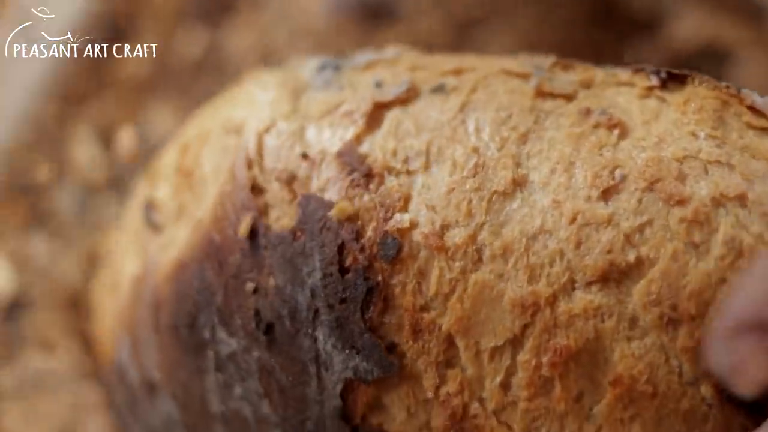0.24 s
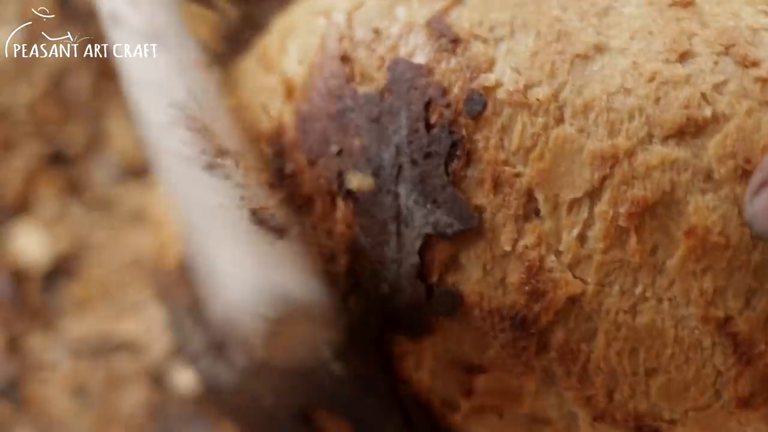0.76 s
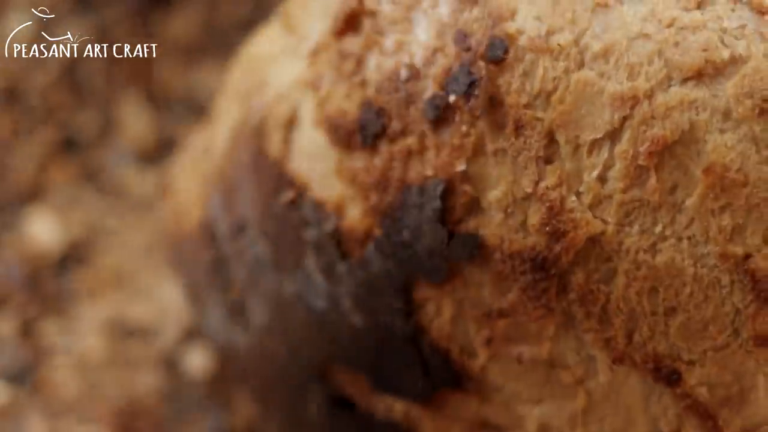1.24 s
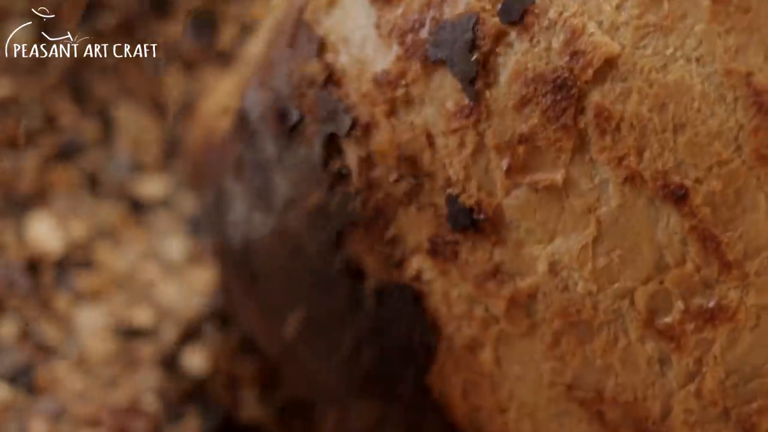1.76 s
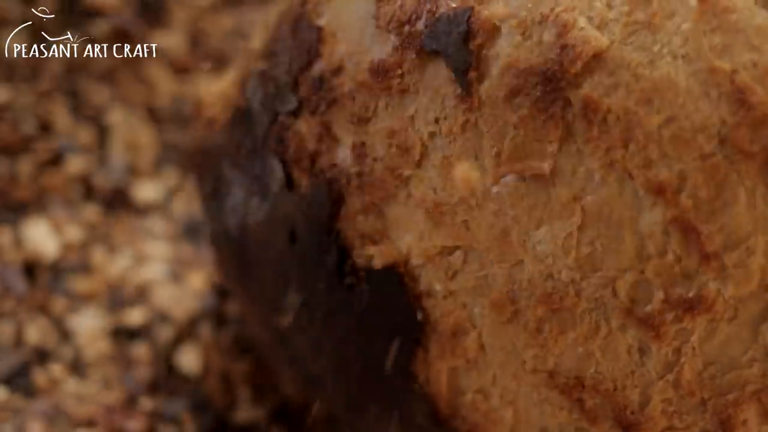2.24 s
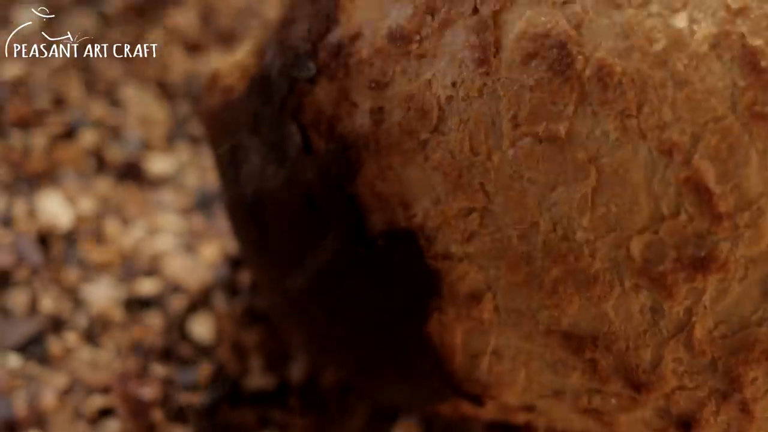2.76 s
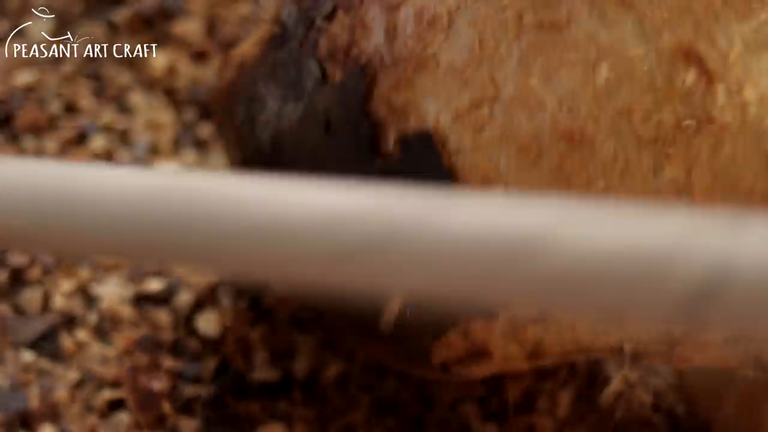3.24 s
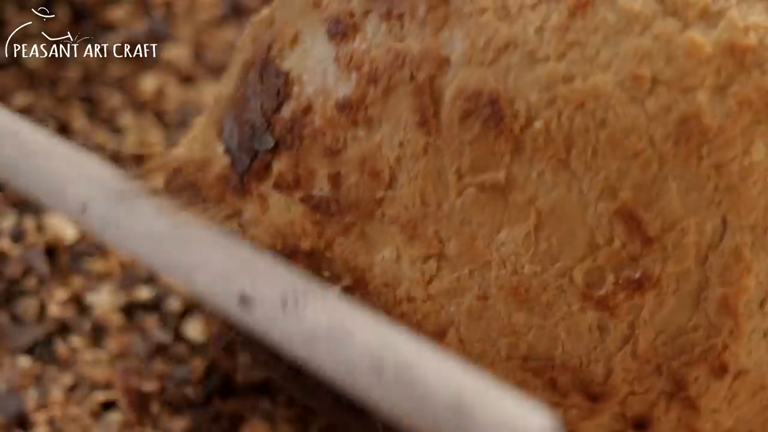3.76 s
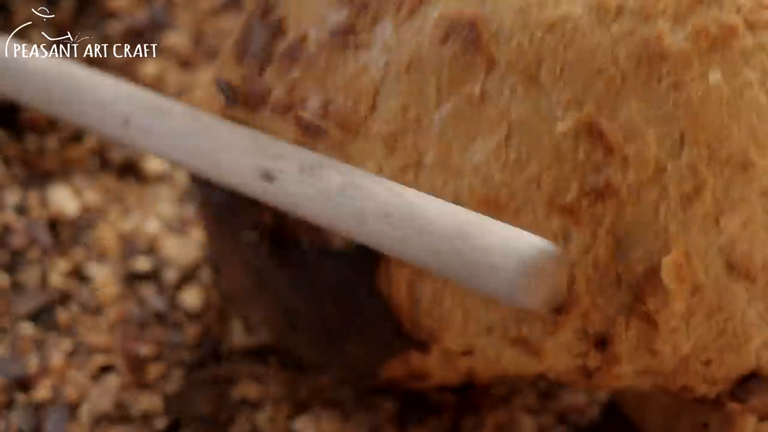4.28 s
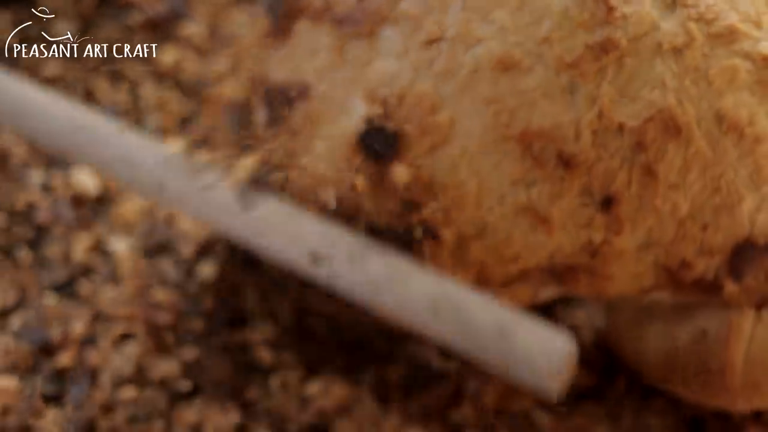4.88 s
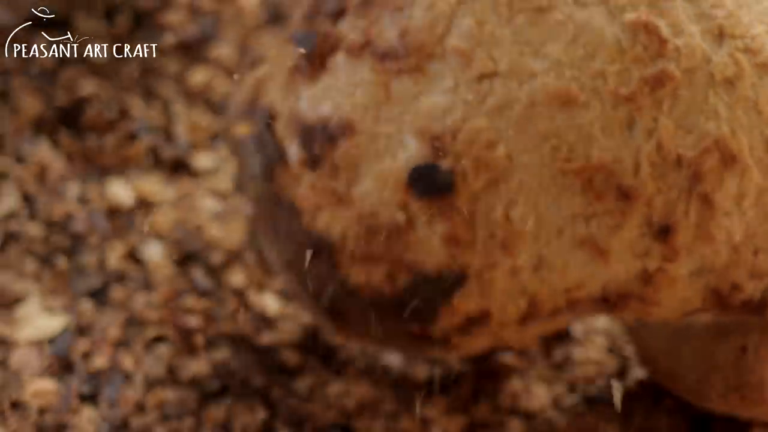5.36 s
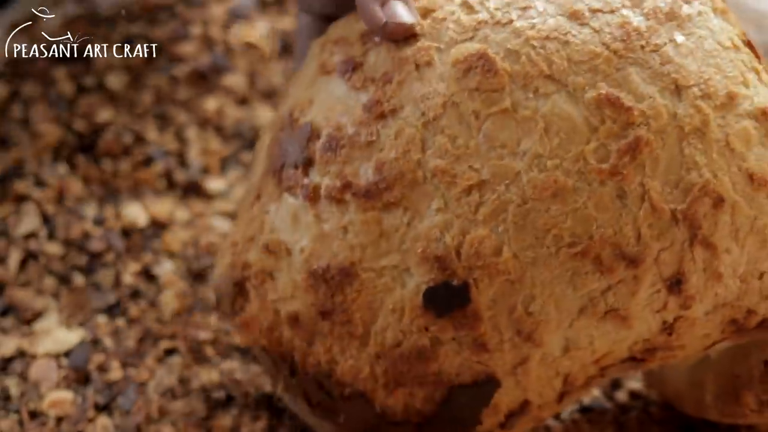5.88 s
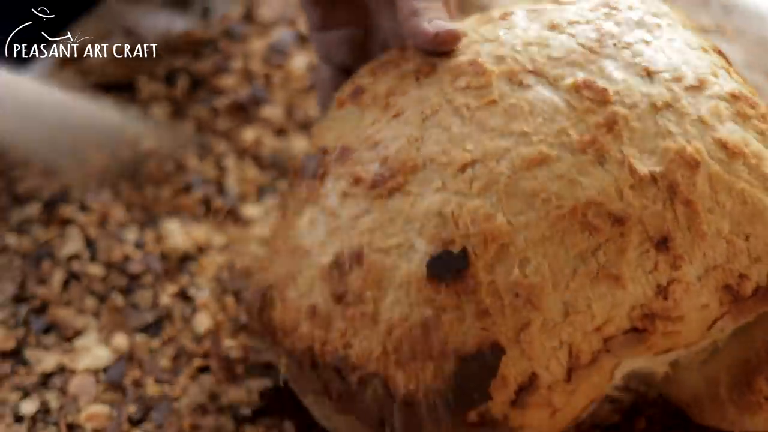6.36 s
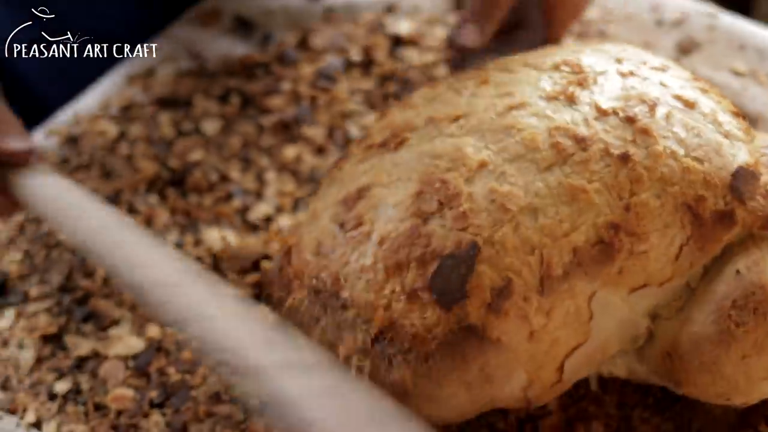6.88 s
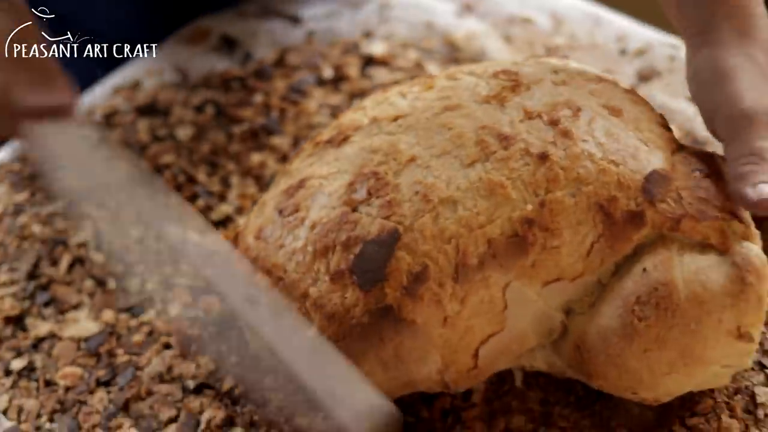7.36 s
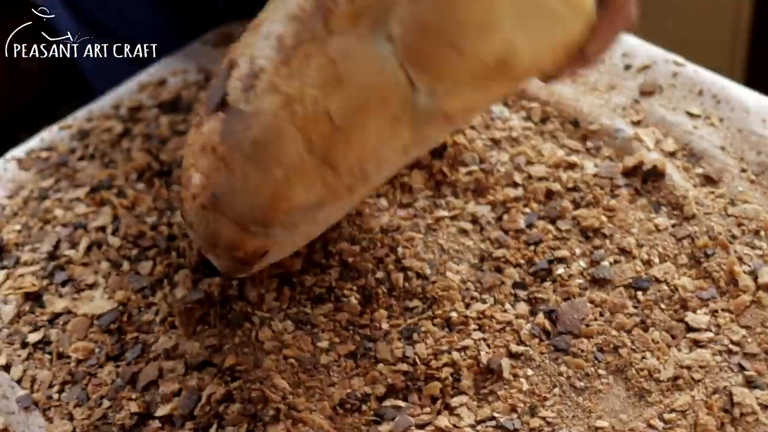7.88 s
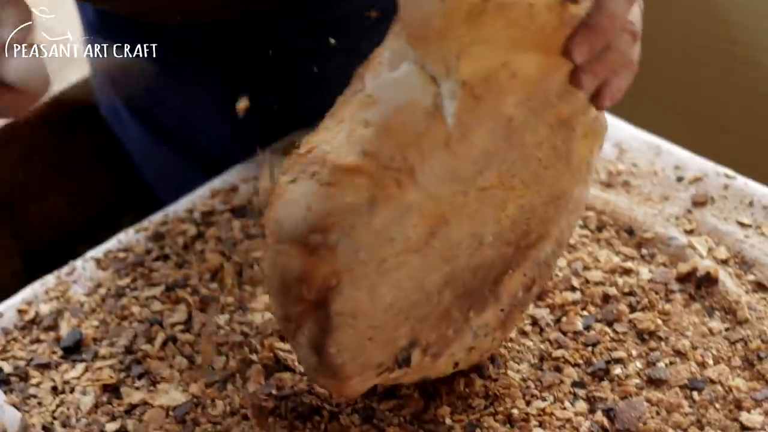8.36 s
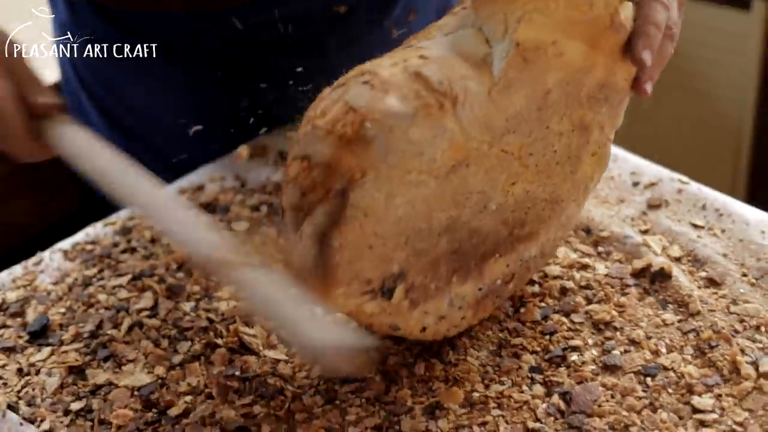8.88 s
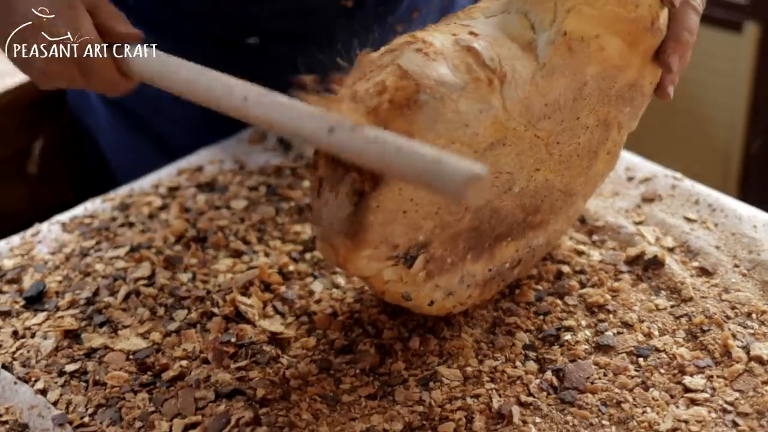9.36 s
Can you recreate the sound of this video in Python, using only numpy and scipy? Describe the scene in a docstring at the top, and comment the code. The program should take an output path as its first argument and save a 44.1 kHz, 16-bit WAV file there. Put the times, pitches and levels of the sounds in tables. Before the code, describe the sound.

A wooden stick beats a big crusty loaf in fast steady strokes, hollow thumps and dry crunches, with flakes and crumbs pattering onto a table.

```python
"""A wooden stick beats the crust of a big loaf, about 3.6 strokes a second with lighter taps between.
Each blow sums damped modes of shell, loaf, stick and table with a dense run of random fractures.
Sparse random clicks make the crumbling crust, the falling flakes and the rustling crumbs on the table.
The loaf bumps on the table in filtered noise and modes; thin hisses and still air lie beneath.
Decaying noise makes the small room; the close stereo microphone clips the highest peaks."""
import sys
import numpy as np
from scipy import signal
from scipy.fft import rfft, irfft, next_fast_len
from scipy.io import wavfile

SR = 44100
rng = np.random.default_rng(int(sys.argv[2]) if len(sys.argv) > 2 else 0)


def put_to_file(sound):
    """Save the sound as 16-bit audio at rate SR, in the file named by the first command-line argument."""
    columns = np.atleast_2d(sound).T  # one column per channel
    safe = np.clip(columns, -1, 1)
    whole_steps = np.round(safe * 32767)
    wavfile.write(sys.argv[1], SR, whole_steps.astype(np.int16))


N = 424683  # length of the scene [samples]
BLOW_SIZE = 20000  # length of one event [samples]
AGE = np.arange(BLOW_SIZE) / SR  # time since the event began [s]
TOP_HZ = 16000  # upper limit of the microphone

# stick on crust; levels are set against each other by fixed offsets in beating():
# (time [s], thump of the loaf [dB], knock of the shell [dB], knock pitch [Hz], crunch [dB],
#  clack pitch of the struck spot [Hz])
STRIKES = [(0.1944, -29, -15, 826, -23, 3370), (0.4734, -15.5, -14, 1010, -15.5, 1096),
           (0.758, -12.5, -13, 714, -18.5, 950), (1.0391, -15.5, -12, 824, -20.0, 1790),
           (1.3144, -15.5, -11.5, 1340, -22.5, 2280), (1.585, -14.5, -14, 920, -19, 1600),
           (1.8624, -14, -5, 1060, -20.5, 590), (2.0478, -30.5, -21, 1680, -30.5, 1500),
           (2.127, -13.5, -12.5, 1310, -23.5, 1980), (2.3103, -29.5, -18, 1620, -32.5, 910),
           (2.3767, -16, -9.5, 1250, -22.5, 530), (2.5939, -43, -20, 1360, -32.0, 3100),
           (2.639, -16.5, -24, 820, -19.5, 1290), (2.8548, -51, -15, 1020, -34.5, 1740),
           (2.8943, -16.5, -13.5, 760, -19, 1470), (3.1172, -46.5, -16, 910, -33.5, 1510),
           (3.1612, -16.5, -13.5, 1230, -20.0, 1240), (3.39, -33, -17.5, 940, -28, 583),
           (3.462, -12, -5, 1050, -18.5, 990), (3.6598, -59, -18, 820, -29, 1310),
           (3.7475, -14, -11, 1490, -19.5, 595), (3.939, -30, -26, 1210, -29, 2230),
           (4.019, -15.5, -15, 900, -22, 1670), (4.1877, -30.5, -29, 840, -30.0, 660),
           (4.2952, -13.5, -11, 1430, -21.0, 735), (4.4466, -37.5, -19, 1110, -30.5, 3700),
           (4.5777, -14.5, -11.5, 1030, -18, 2030), (4.8606, -15, -6.5, 1580, -19.5, 297),
           (5.1563, -12.5, -6, 1430, -19.5, 840), (5.3187, -22.5, -14, 1260, -28.5, 2050),
           (5.445, -16, -17.5, 920, -20.0, 1070), (5.5982, -24, -18, 1495, -29.5, 2560),
           (5.723, -15.5, -13.5, 1480, -21.5, 1230), (5.8784, -28.0, -29, 540, -34, 2520),
           (6.0114, -17, -15, 920, -22, 665), (6.1404, -26, -24, 980, -29, 930),
           (6.2662, -15.5, -16, 1040, -22.0, 846), (6.4256, -23, -18, 1850, -30.0, 3800),
           (6.5399, -14.5, -9.5, 1300, -22, 296), (6.7238, -27.0, -25, 1560, -30, 3380),
           (6.8303, -17.5, -12, 1040, -21, 1710), (7.059, -26, -20, 2230, -32, 2300),
           (7.1218, -17, -14.5, 1190, -25.5, 1800), (7.3636, -26, -19, 2160, -30.5, 3630),
           (7.407, -16.5, -13, 524, -24.5, 1270), (7.6685, -25, -18, 1970, -28.5, 920),
           (7.6994, -17.0, -16, 500, -24.0, 1110), (7.9672, -24, -22, 1570, -30.0, 1100),
           (7.9892, -19.5, -14, 1050, -23.5, 1900), (8.2384, -25, -23, 1580, -28.5, 1550),
           (8.2643, -30, -9, 836, -23.5, 710), (8.5393, -24.5, -26, 3870, -20.5, 5700),
           (8.5473, -28, -16.5, 1030, -24, 920), (8.827, -24, -20.5, 1270, -22, 480),
           (8.847, -23, -21, 2440, -26, 3430), (9.0966, -21.5, -16.5, 1146, -23.5, 2100),
           (9.1625, -24, -27.0, 725, -33, 850), (9.366, -24.5, -14, 535, -26, 735),
           (9.4437, -25.5, -27, 4050, -32, 1160)]
# cracked crust goes on crumbling: (time [s], pitch of the fragments [Hz], level [dB])
CRUMBLES = [(2.049, 3250, -31.5), (2.312, 3700, -32), (2.597, 4400, -35), (3.392, 2450, -31),
            (4.865, 3100, -31), (5.159, 2810, -25), (8.1, 3000, -41.5), (9.449, 3440, -35.5)]
# the loaf rocks against the table, before the offset of each part: (time [s], level [dB])
BUMPS = [(0.001, -32.5), (0.129, -32), (0.257, -29), (0.399, -37.5), (0.687, -39), (0.949, -35.5),
         (1.232, -36.5), (2.492, -41), (3.3, -31.5), (5.667, -30.5), (5.92, -29.5), (6.217, -33),
         (6.357, -29.5), (6.492, -30), (6.625, -23.5), (6.763, -29), (7.486, -34), (7.612, -32.5),
         (8.474, -31.5)]
# single large flakes land: (time [s], level [dB])
FLAKES = [(0.245, -42.5), (1.204, -52), (1.652, -42), (2.001, -44.5), (2.41, -27.5), (3.505, -32),
          (4.902, -33.5)]
# the loaf is pushed over the crumbs: (time of greatest push [s], swell time [s], level [dB])
SLIDES = [(0, 0.037, -50.5), (.39, 0.22, -51.5), (.9, 0.21, -50.5), (1.47, 0.22, -48.5), (2.0, 0.33, -54.5),
          (2.5, 0.18, -55), (3.04, 0.11, -55), (3.301, 0.24, -54.5), (4.12, 0.23, -52), (6.55, 0.9, -59.5),
          (7.58, 0.13, -59)]
# thin, brief hisses: (time of greatest height [s], swell time [s], centre [Hz], level [dB])
HISSES = [(.18, 0.1, 8250, -58), (.96, 0.062, 8800, -56.5), (1.27, 0.035, 7240, -54),
          (1.38, 0.063, 7860, -50), (1.388, 0.11, 5670, -52), (2.49, 0.06, 10600, -59.5)]

# loaf and table ring together: (frequency [Hz], relative level [dB], t60 [s])
TABLE_MODES = [(153.8, 6.5, 0.17), (206, 2.5, 0.087), (220.7, -2.5, 0.16), (276.5, -2.5, 0.32),
               (298.7, -3, 0.35), (491.6, -0.5, 0.15)]
# the wooden stick, before the detuning by the grip: (frequency [Hz], relative level [dB], t60 [s])
STICK_MODES = [(664, 23, 0.014), (1190, 0, 0.16), (1414, 7, 0.074), (3200, -3.5, 0.043)]

# spectrum of the fracturing crust: (frequency [Hz], relative level [dB])
CRUNCH_SPECTRUM = [(300, -6), (900, 1), (3200, -0.5), (4300, -2), (6200, -2.55), (8000, -1), (10500, -6.5),
                   (15500, -8.5)]
# spectrum of flakes and crumbs: (frequency [Hz], relative level [dB])
FLAKE_SPECTRUM = [(400, -12), (1200, 0.5), (2800, -2.5), (5000, -8.5), (8500, -8.5), (15500, -20)]
# spectrum of the rumble under a bump: (frequency [Hz], relative level [dB])
BUMP_SPECTRUM = [(40, -38), (90, 0), (170, 5), (410, -5), (520, -2.5), (760, -14.5), (2000, -27.5),
                 (8000, -51.5)]
# spectrum of the reflections: (frequency [Hz], relative level [dB])
ROOM_SPECTRUM = [(50, -8.5), (120, -3.5), (300, -1.5), (400, 3), (520, 4.5), (720, -0.5), (3000, 0),
                 (15000, -1)]
# spectrum of the still air: (frequency [Hz], relative level [dB])
QUIET_SPECTRUM = [(30, -31), (139, 0), (288, -5.5), (426, -7.5), (497, -6.5), (837, -10), (1560, -17),
                  (8470, -50), (15000, -22)]
# the room dies away: (frequency [Hz], t60 [s])
ROOM_T60 = [(100, 0.4), (400, 0.26), (1200, 0.23), (9000, 0.2), (15000, 0.17)]
# stereo width, as gain of the side signal: (frequency [Hz], level [dB])
WIDTH = [(100, -12.5), (300, -6.5), (1200, -10.5), (3000, -10), (6000, -5), (14000, -1.5)]

# a full blow is heard mostly direct; the lighter the thump, the larger the share of the room
FULL_THUMP_DB, FULL_ROOM_DB, ROOM_DB_PER_DB, TAP_ROOM_DB = -15, -9, 0.3, -3
# from this moment [s] the loaf is turned and raised, and every blow reaches the room alike
TURNED_S, TURNED_ROOM_DB = 6.8, -5
# the thinner crust met after the turn snaps as brightly as under a blow this much harder
TURNED_CRISP_DB = 3.5
# between pushes the crumb bed keeps settling, ever more faintly
SETTLING_DB, SETTLING_FALL_DB_PER_S = -62.5, 0.23


def undb(db):
    """Level to amplitude ratio: 20 dB is a factor of ten."""
    return 10 ** (np.asarray(db) / 20)


def along(hz, points):
    """Linear interpolation of (Hz, value) points on a logarithmic frequency axis."""
    at, value = np.transpose(points)
    return np.interp(np.log(hz + 1), np.log(at + 1), value)


def colour(x, points):
    """Minimum-phase filtering: folding the cepstrum makes a given (Hz, dB) spectrum causal."""
    size = 2 * next_fast_len(x.shape[-1] // 2 + 1024)
    hz = np.arange(size // 2 + 1) * SR / size
    cepstrum = irfft(np.log(undb(along(hz, points))))
    cepstrum[1:size // 2] *= 2
    cepstrum[size // 2 + 1:] = 0
    response = np.exp(rfft(cepstrum))
    return irfft(rfft(x, size) * response)[..., :x.shape[-1]]


def passed(x, order, hz, kind):
    """Butterworth filtering: a maximally flat pass band."""
    return signal.sosfilt(signal.butter(order, hz, kind, fs=SR, output="sos"), x)


def burst(x, db):
    """Energy scaling: the whole energy, packed into 5 ms, has this level."""
    return x * undb(db) / np.sqrt(np.sum(x ** 2) / (.005 * SR) + 1e-18)


def fade(t60):
    """Exponential decay: constant fractional loss, 60 dB in t60 seconds."""
    return np.exp(-np.log(1000) * AGE / max(t60, 1e-4))


def ring(hz, t60):
    """Damped free vibration of a single mode."""
    return np.sin(2 * np.pi * hz * AGE) * fade(t60)


def spread(mid, side):
    """Sum and difference stereo, the side signal filtered by the width."""
    return mid + np.array([[1], [-1]]) * colour(side, WIDTH)


def add(out, s, x):
    """Superposition of a sound on the scene at time s."""
    start = max(int(s * SR), 0)
    part = out[:, start:start + BLOW_SIZE]
    part += x[..., :part.shape[1]]


def crackle(density, scatter_db, size):
    """Random point process: sparse clicks of very unequal strength, density a second."""
    strength = undb(scatter_db * np.minimum(rng.exponential(size=size), 4))
    struck = rng.random(size) < density / SR
    return struck * strength * rng.standard_normal(size)


def wander(rate, size=N):
    """Random course: straight lines between normal draws, rate of them a second."""
    knots = np.arange(0, size / SR + 1, 1 / rate)
    return np.interp(np.arange(size) / SR, knots, rng.standard_normal(len(knots)))


def quiet():
    """Stationary random noise: the still air of the room."""
    air = colour(rng.standard_normal((2, N)), QUIET_SPECTRUM)
    return spread(*air / air.std()) * undb(-62.5)


def room_decay():
    """Frequency-dependent reverberation: band masks, and decays that begin after a few ms."""
    hz = np.arange(BLOW_SIZE // 2 + 1) * SR / BLOW_SIZE
    centres = np.array(ROOM_T60)[:, 0]
    masks = np.array([along(hz, np.c_[centres, row]) for row in np.eye(len(centres))])
    arrival = np.clip((AGE - .0025) / 0.0012, 0, 1)
    decays = np.array([fade(t60) * arrival for _, t60 in ROOM_T60])
    return masks * undb(along(hz, ROOM_SPECTRUM)), decays


def room(x, masks, decays):
    """Diffuse reflection: convolution with decaying noise in uneven clumps, new for every sound."""
    clumps = undb(2.2 * wander(300, size=BLOW_SIZE))
    clumps = clumps / np.sqrt(np.mean(clumps ** 2))
    noise = rfft(rng.standard_normal((2, 1, BLOW_SIZE)) * clumps)
    tails = np.sum(irfft(noise * masks) * decays, axis=1)
    mid, side = tails / np.sqrt(np.mean(np.sum(decays ** 2, axis=1)))
    return signal.fftconvolve(spread(mid, side), x[None], axes=1)[:, :BLOW_SIZE]


def room_share(s, thump_db):
    """Direct-to-reverberant balance: level of the reflections against a blow's direct sound, in dB."""
    if s > TURNED_S:
        return TURNED_ROOM_DB
    return min(FULL_ROOM_DB + ROOM_DB_PER_DB * (FULL_THUMP_DB - thump_db), TAP_ROOM_DB)


def hisses():
    """Band-limited random clicks: narrow, grainy hiss that swells and fades."""
    out = np.zeros((2, N))
    for s, swell_s, hz, db in HISSES:
        grains = [crackle(1200, 1.1, BLOW_SIZE) for _ in range(2)]
        mid, side = passed(grains, 2, hz + 280 * np.array([-1, 1]), "bandpass")
        start = max(s - BLOW_SIZE / SR / 2, 0)
        swell = np.exp(-((start + AGE - s) / swell_s) ** 2)
        add(out, start, spread(mid, side) / mid.std() * swell * undb(db))
    return out


def specks():
    """Impacts of tiny hard bodies: skipping crumbs give lone, bright ticks that shift sideways."""
    ticks = passed(crackle(110, 1.8, N), 2, 5000, "high")
    place = wander(30) / 2
    return ticks * np.array([1 + place, 1 - place]) * undb(-41.5)


def stirring():
    """Addition of powers: fading settling of the crumbs and a smooth swell for each push."""
    t = np.arange(N) / SR
    pushes = sum((undb(db) * np.exp(-((t - s) / swell_s) ** 2)) ** 2 for s, swell_s, db in SLIDES)
    settling = undb(SETTLING_DB - SETTLING_FALL_DB_PER_S * t)
    return np.sqrt(pushes + settling ** 2)


def crumbs():
    """Granular friction: the crumb bed rustles in patches, with single crumbs ticking above it."""
    grains = np.array([crackle(6000, 1.0, N) + 0.76 * crackle(260, 3.4, N) for _ in range(2)])
    grains = colour(grains, FLAKE_SPECTRUM)
    grains = grains / grains.std()
    # coarse and fine crumbs vary on their own
    coarse = passed(grains, 1, 4000, "low")
    fine = grains - coarse
    patchy = coarse * undb(4.4 * wander(28)) + fine * undb(1.0 * wander(6.4))
    return spread(*patchy) * stirring()


def landing(masks, decays):
    """Impact of a light plate: a large flake lands with a dry tick of decaying noise."""
    out = np.zeros((2, N))
    for s, db in FLAKES:
        noise = rng.standard_normal(BLOW_SIZE) * fade(0.016)
        tick = burst(colour(noise, FLAKE_SPECTRUM), db)
        add(out, s, tick + undb(-13.0) * room(tick, masks, decays))
    return out


def rocking():
    """Impact on a yielding bed: the dropped loaf gives a thud, a table ring and a loose rumble."""
    out = np.zeros((2, N))
    push = (1 - np.exp(-AGE / 0.0024)) * (fade(0.021) + 0.3 * fade(0.44))
    landing_ramp = 1 - np.exp(-AGE / 0.002)
    for s, db in BUMPS:
        noises = [rng.standard_normal(BLOW_SIZE) * push for _ in range(2)]
        mid, side = (burst(colour(noise, BUMP_SPECTRUM), db - 4.5) for noise in noises)
        # each landing spot gives the thud its own pitch and stirs the modes of the table differently
        thud = ring(200 * undb(0.78 * rng.standard_normal()), 0.027) * landing_ramp
        board = ring(497 * undb(0.3 * rng.standard_normal()), 0.17) * landing_ramp
        table = sum(undb(mode_db) * rng.standard_normal() * ring(hz, t60)
                    for hz, mode_db, t60 in TABLE_MODES) * landing_ramp
        tones = burst(thud, db - 4.0) + burst(board, db - 13.5) + burst(table, db - 4.5)
        add(out, s, spread(mid, side) + tones)
    return out


def crumbling():
    """Progressive fracture: a coarse run of fragments breaks from the cracked spot and dies out."""
    out = np.zeros((2, N))
    run = (1 - np.exp(-AGE / .004)) * fade(0.18)
    for s, hz, db in CRUMBLES:
        fragments = [crackle(1300, 2.2, BLOW_SIZE) * run for _ in range(2)]
        band_hz = hz * 1.28 ** np.array([-1, 1])
        mid, side = (burst(passed(x, 3, band_hz, "bandpass"), db) for x in fragments)
        add(out, s, spread(mid, side))
    return out


def shower(db):
    """Random impacts of thinning rate: flakes thrown off by a blow rain back onto the table."""
    falling = (1 - np.exp(-AGE / .04)) * fade(0.33)
    flakes = [crackle(370, 5.2, BLOW_SIZE) * falling for _ in range(2)]
    mid, side = (burst(colour(x, FLAKE_SPECTRUM), db) for x in flakes)
    return spread(mid, side)


def crunch(db, length_s):
    """Brittle fracture: a dense run of tiny cracks while the stick sinks in."""
    pressing = np.exp(-(AGE / length_s) ** 2) + undb(-32.5) * fade(0.01)
    cracks = [crackle(16000, 1.9, BLOW_SIZE) * pressing for _ in range(2)]
    mid, side = (burst(colour(x, CRUNCH_SPECTRUM), db) for x in cracks)
    return spread(mid, side)


def brittle(x, db):
    """Rate of fracture: a weak blow breaks the crust slowly and so lacks the highest treble."""
    edge_hz = np.clip(16000 * undb(0.69 * (db + 21.0)), 3000, .45 * SR)
    return passed(x, 2, edge_hz, "low")


def plate(hz, db):
    """Local plate resonance: a spot of crust clacks at its own pitch over weaker stray modes."""
    clack = burst(AGE * ring(hz, 0.0051), db)
    pitches = 1500 * 3.643 ** rng.random(size=6)
    strays = sum(ring(stray, 50 / stray) * rng.standard_normal() for stray in pitches)
    return clack + burst(strays, db - 3.5)


def weighty(x, depth):
    """Inertia of the moved mass: only a heavy blow moves enough of the loaf for deep bass."""
    lowest_hz = np.clip(38 / depth ** 4, 25, 135)
    return passed(x, 2, lowest_hz, "high")


def beating(masks, decays):
    """Impact excitation: each blow sets off shell, loaf, crust, stick, table, room and flakes."""
    out = np.zeros((2, N))
    table = sum(undb(db) * ring(hz, t60) for hz, db, t60 in TABLE_MODES) * (1 - np.exp(-AGE / 0.0085))
    # summed over all directions the fractures have a smooth spectrum: this is what the walls receive
    snap = colour(signal.unit_impulse(BLOW_SIZE), CRUNCH_SPECTRUM)
    for s, thump_db, knock_db, knock_hz, crunch_db, clack_hz in STRIKES:
        # the shell is pushed away first; a glancing tap leaves it free to ring a little longer
        knock_t60 = 0.0037 * undb(0.097 * max(knock_db - thump_db, 0))
        knock = burst(-ring(knock_hz, knock_t60), knock_db - 4.5)
        # a heavier blow sinks in for longer: a deeper thump of the soft loaf and a longer crunch
        depth = undb(0.22 * (thump_db + 12.5))
        thump = burst(ring(min(172 / depth, 265), 0.028), thump_db)
        # the dome of the crust answers the thump with a hollow note
        hollow = burst(-ring(693, 0.013), thump_db - 8.0)
        # the grip detunes the stick a little from stroke to stroke
        grip = 1 + 0.043 * rng.standard_normal()
        stick_modes = sum(undb(db) * ring(hz * grip, t60) for hz, db, t60 in STICK_MODES)
        stick = burst(stick_modes, knock_db - 15.5)
        body = weighty(knock + thump + hollow + stick, depth)
        # the small struck spot beams its clack at the microphone; less of it reaches the walls
        clack = plate(clack_hz, crunch_db)
        breaking_db = crunch_db + 4.0
        # a light tap scatters relatively more of its crunch around the room
        scattered_db = breaking_db + 0.12 * max(-17.0 - crunch_db, 0)
        crisp_db = crunch_db + TURNED_CRISP_DB * (s > TURNED_S)
        scattered = brittle(burst(snap, scattered_db), crisp_db)
        echoes = room(body + undb(-3.0) * clack, masks, decays) + room(scattered, masks, decays)
        breaking = brittle(crunch(breaking_db, 0.0031 * depth), crisp_db)
        close = body + clack + breaking + burst(table, thump_db - 9.0)
        reflected = undb(room_share(s, thump_db)) * echoes
        add(out, s, close + reflected + shower(crunch_db - 27.0))
    return out


def scene():
    """Superposition of all sources on and around the table."""
    masks, decays = room_decay()
    background = quiet() + hisses() + specks() + crumbs()
    loaf = landing(masks, decays) + rocking() + crumbling()
    return background + loaf + beating(masks, decays)


def record(dry):
    """Arrival-time difference and limiting: right lags left, rumble is cut, peaks clip, the top is cut."""
    lag_s = 1.0e-5
    size = next_fast_len(N + 64)
    hz = np.arange(size // 2 + 1) * SR / size
    late = irfft(rfft(dry[1], size) * np.exp(-2j * np.pi * hz * lag_s), size)[:N]
    lean = passed([dry[0], late], 5, 65, "high")
    top_cut = signal.ellip(8, .2, 70, TOP_HZ, fs=SR, output="sos")
    return signal.sosfilt(top_cut, np.clip(lean, -1, 1))


dry = scene()
out = record(dry)
put_to_file(out)
```